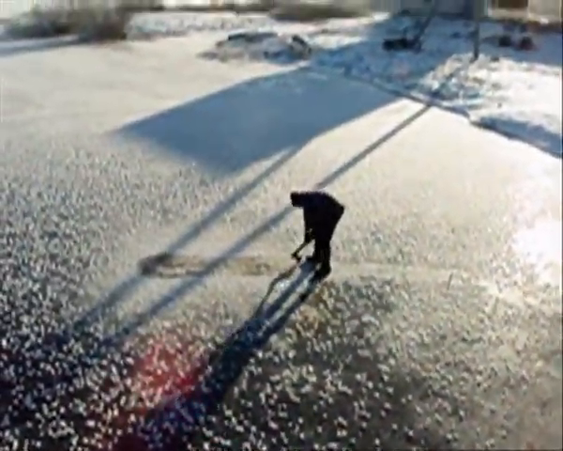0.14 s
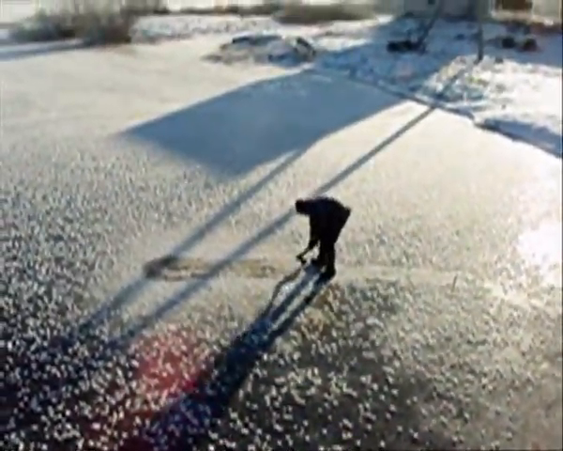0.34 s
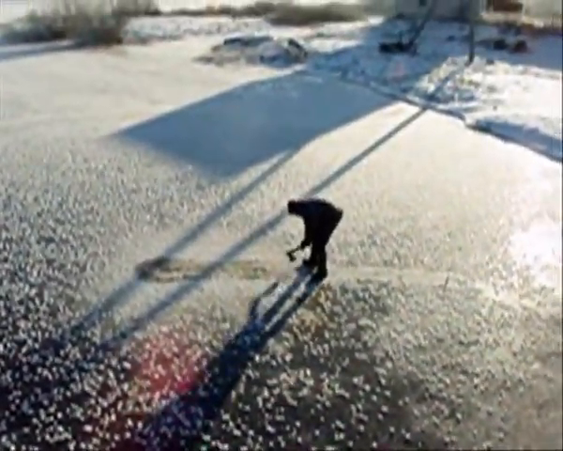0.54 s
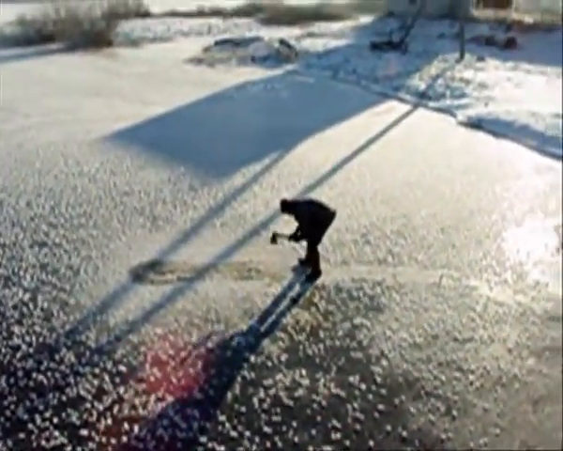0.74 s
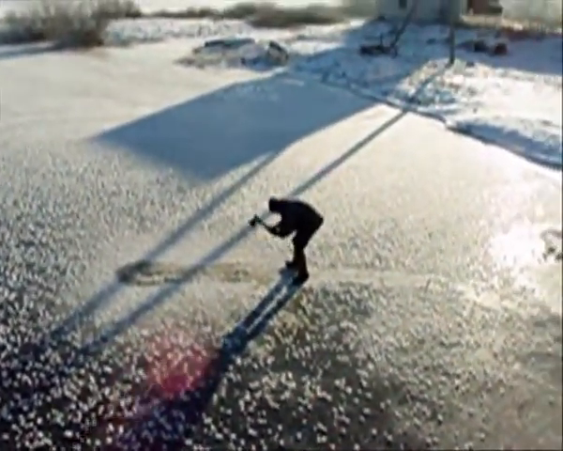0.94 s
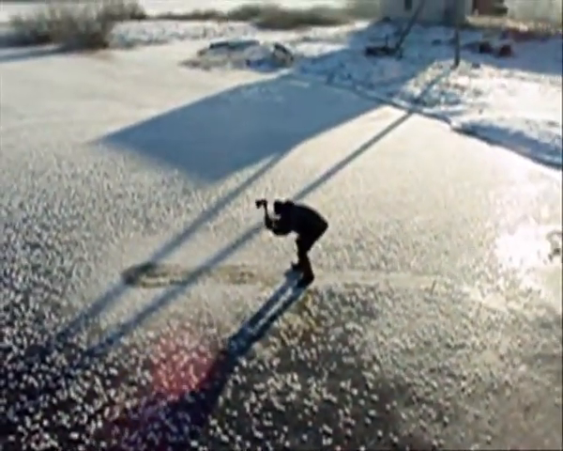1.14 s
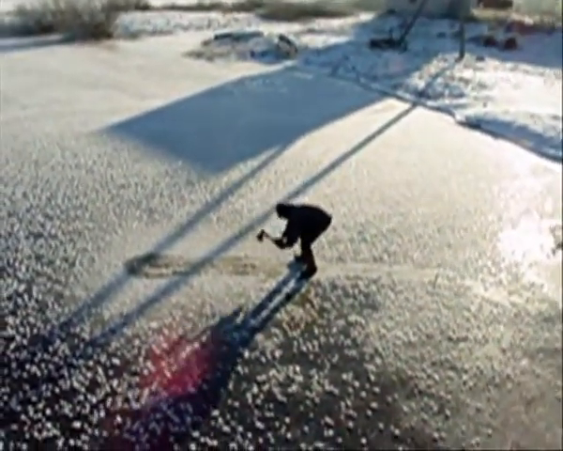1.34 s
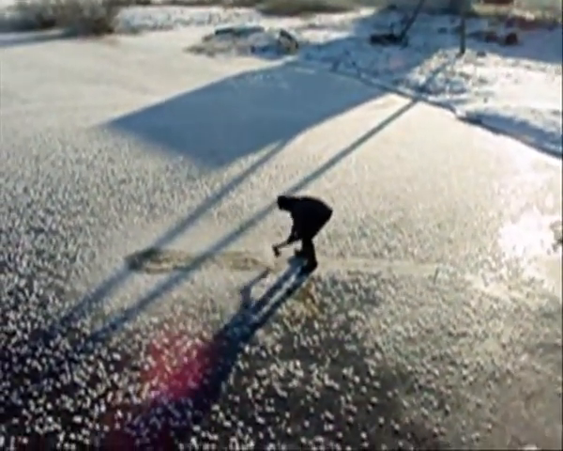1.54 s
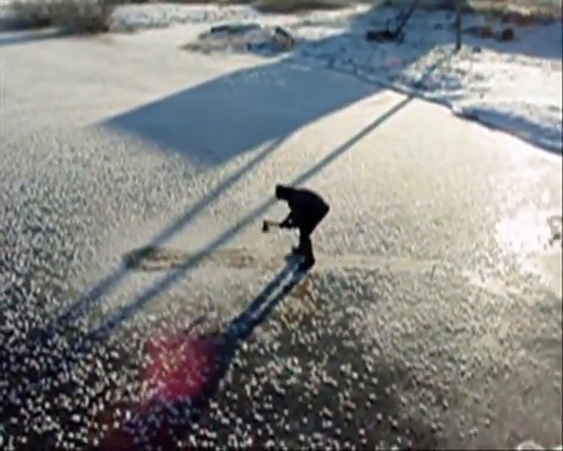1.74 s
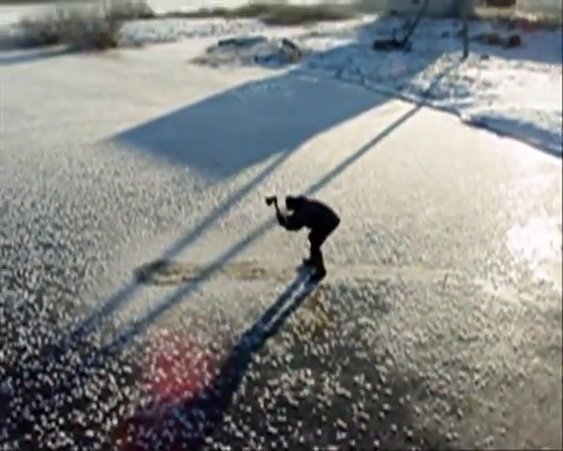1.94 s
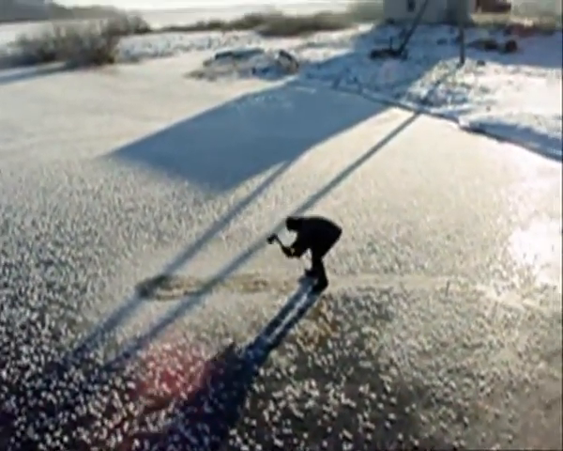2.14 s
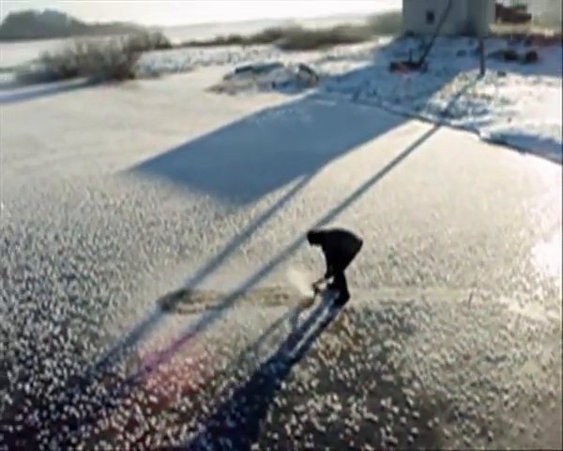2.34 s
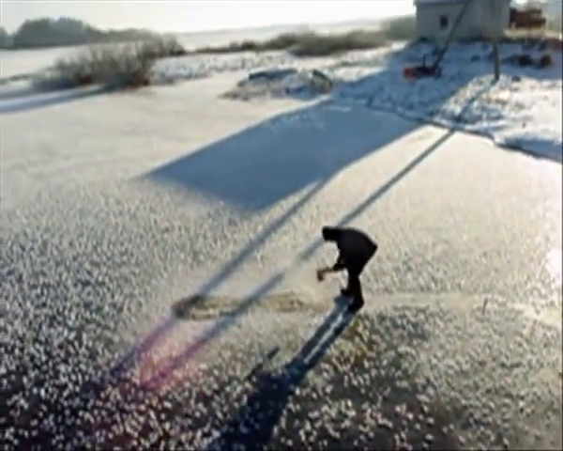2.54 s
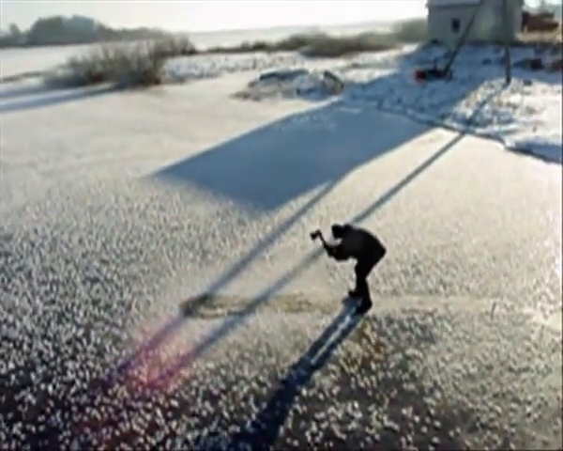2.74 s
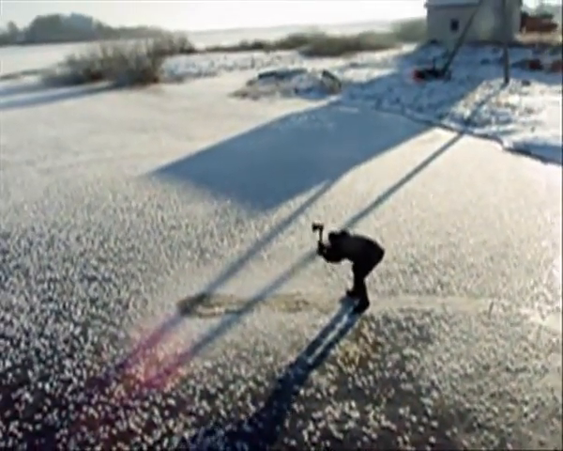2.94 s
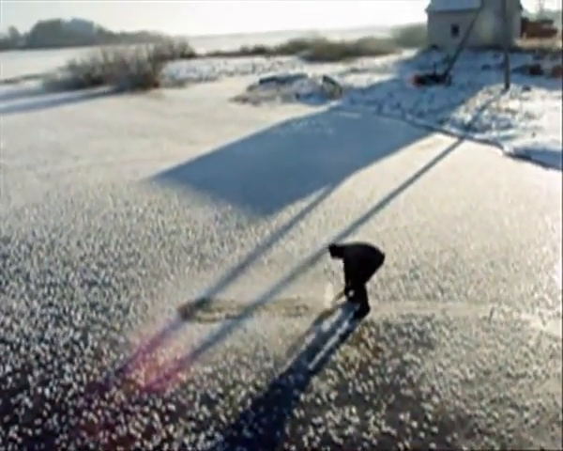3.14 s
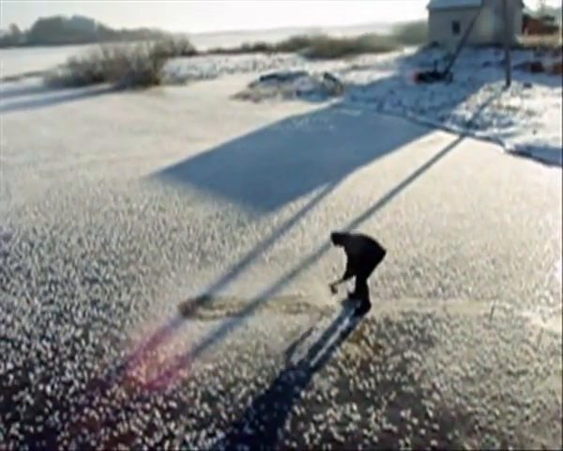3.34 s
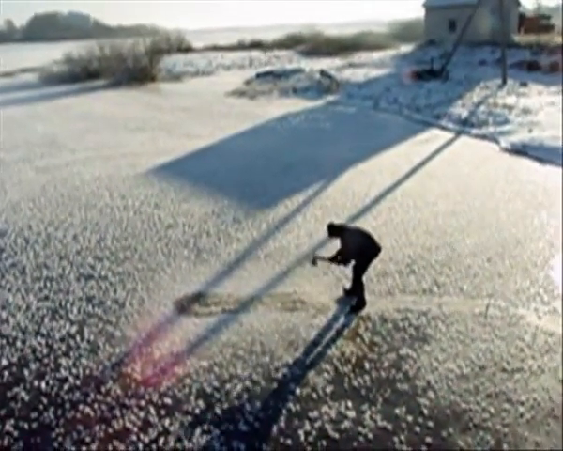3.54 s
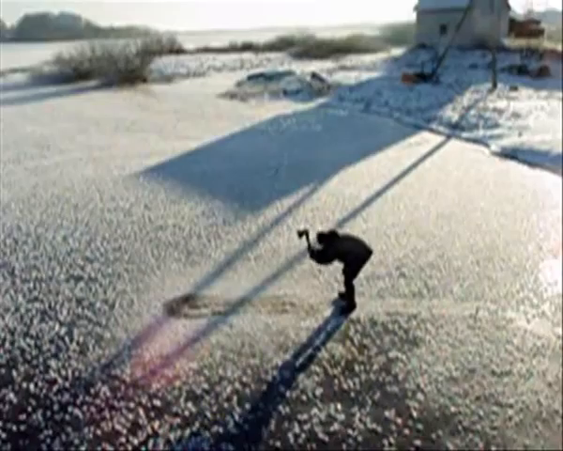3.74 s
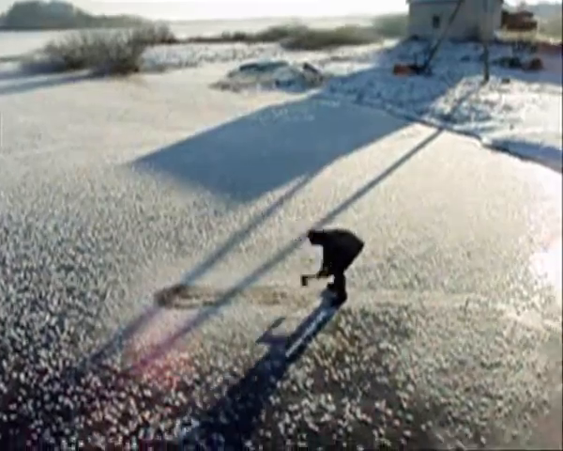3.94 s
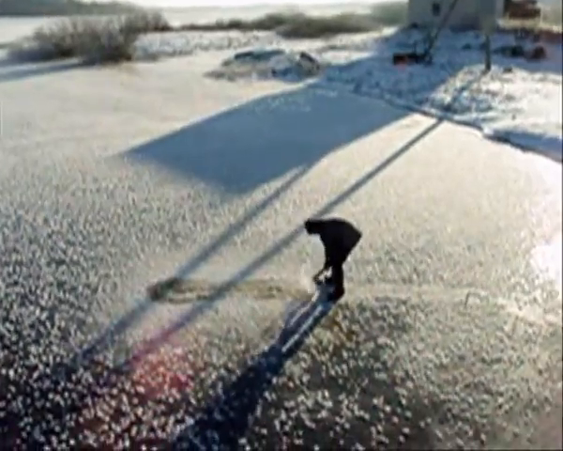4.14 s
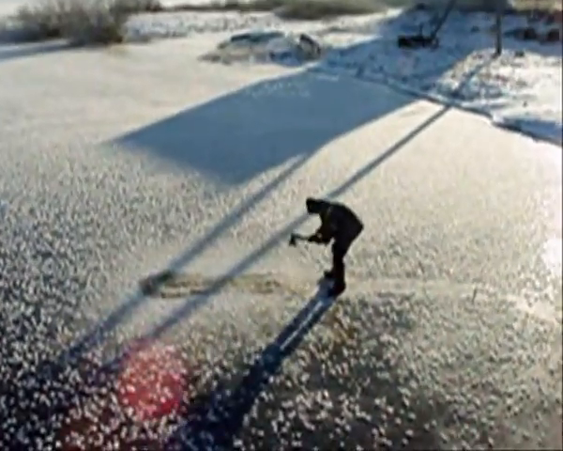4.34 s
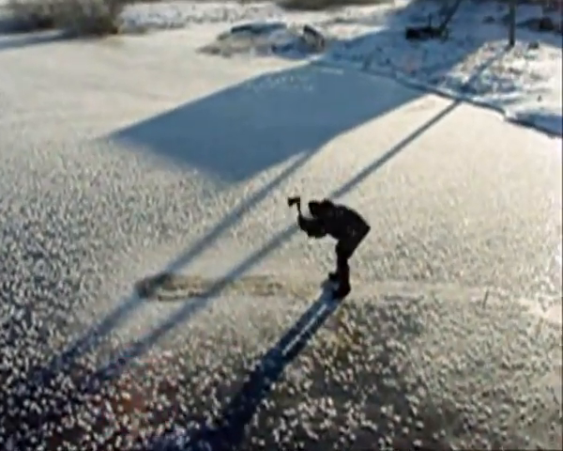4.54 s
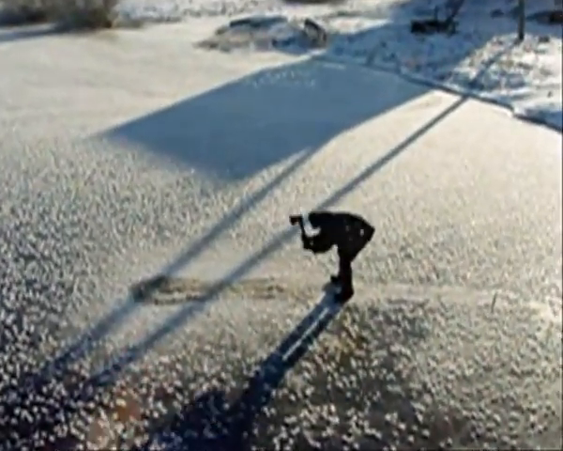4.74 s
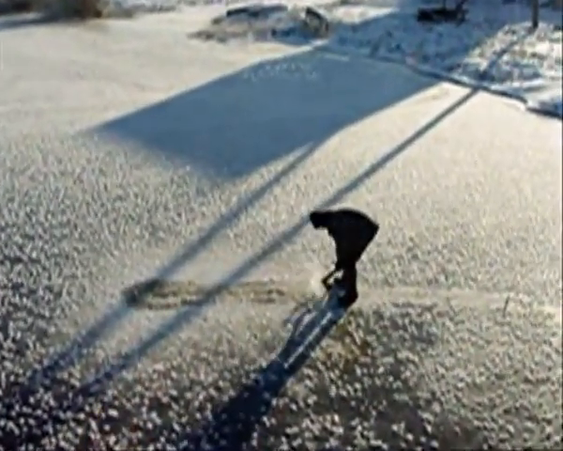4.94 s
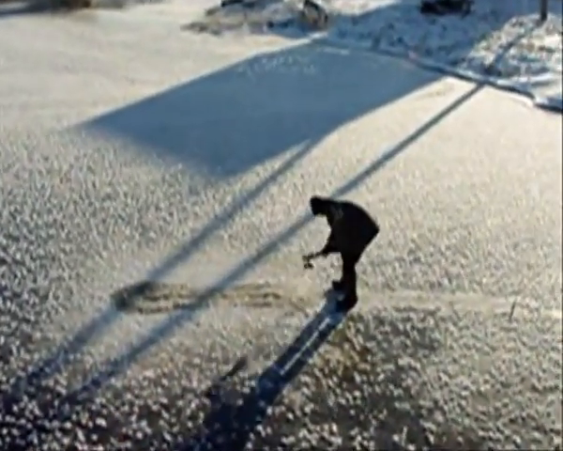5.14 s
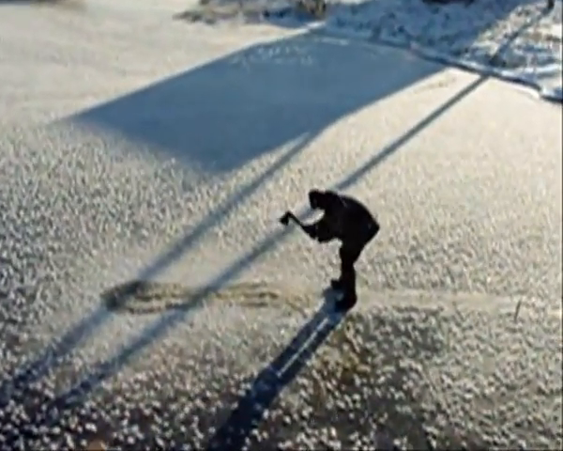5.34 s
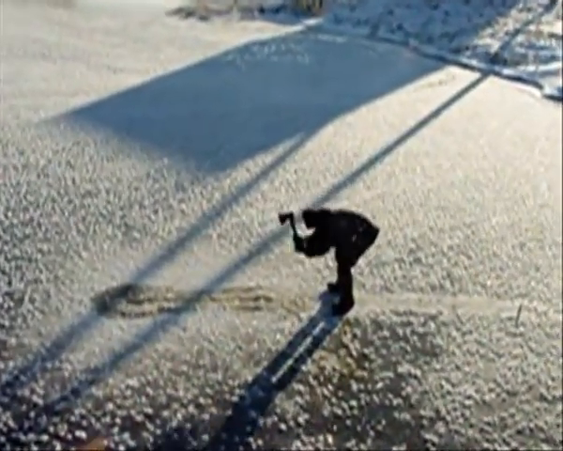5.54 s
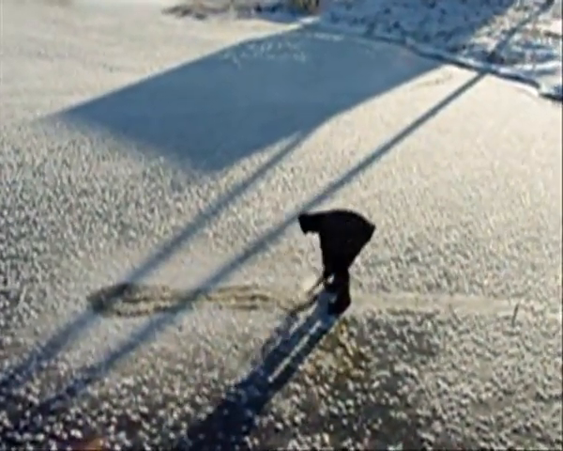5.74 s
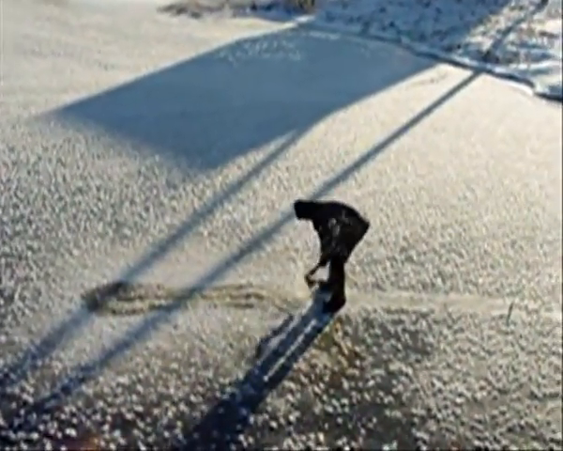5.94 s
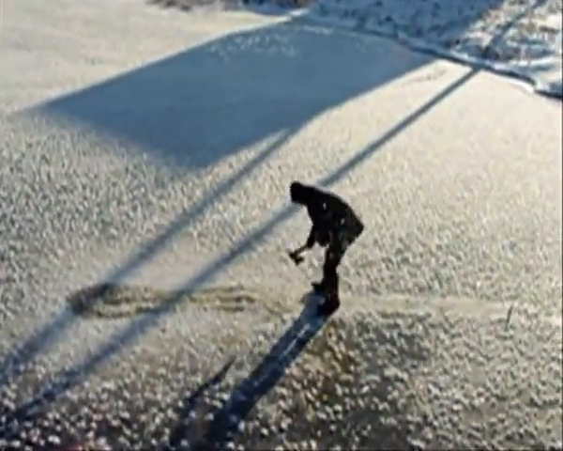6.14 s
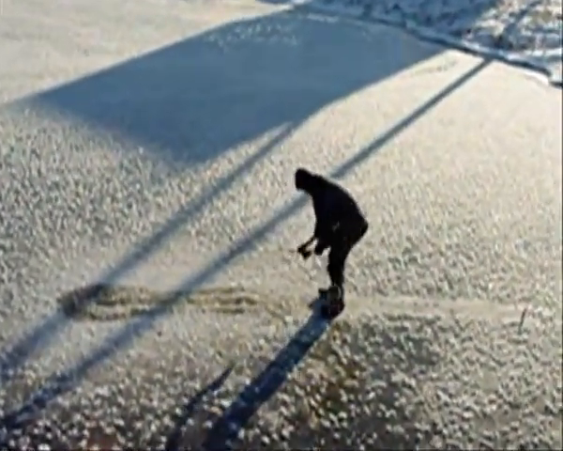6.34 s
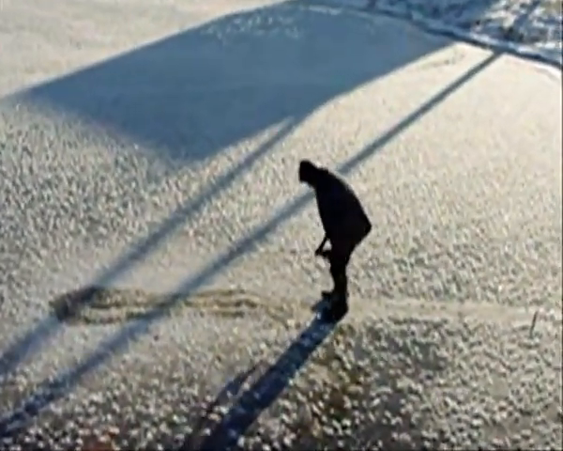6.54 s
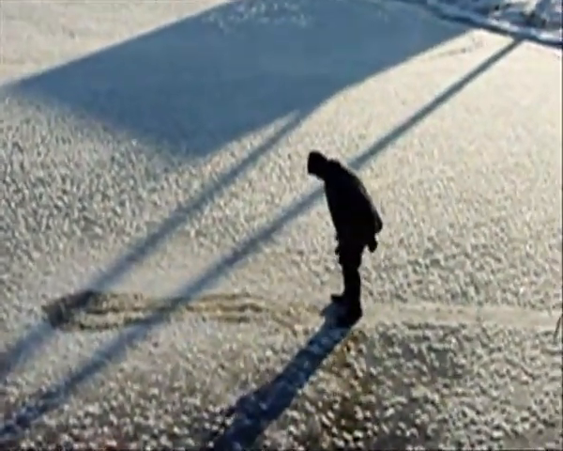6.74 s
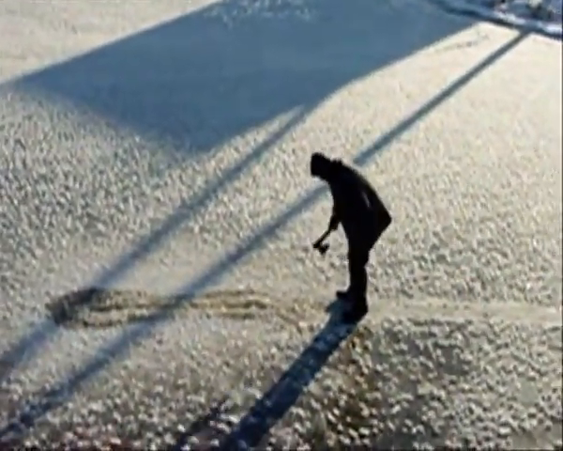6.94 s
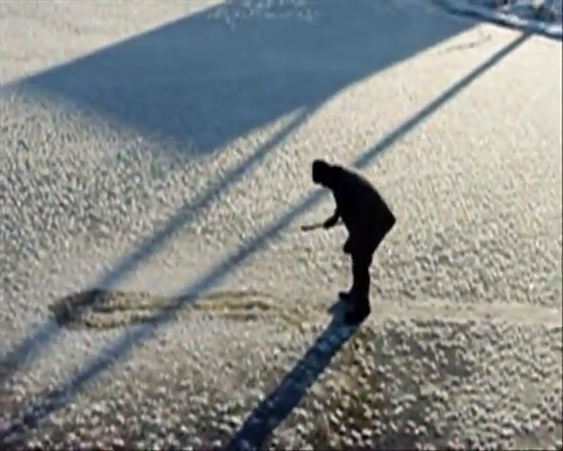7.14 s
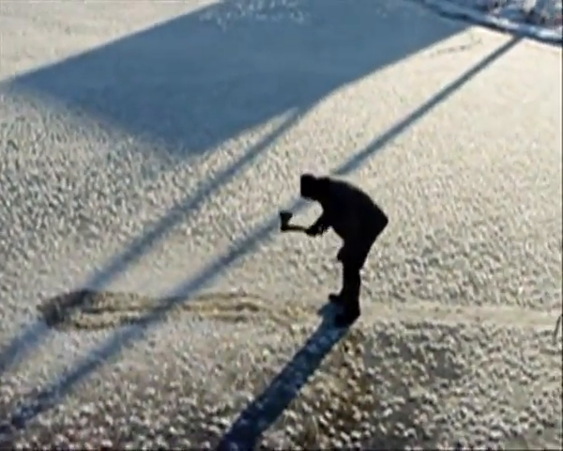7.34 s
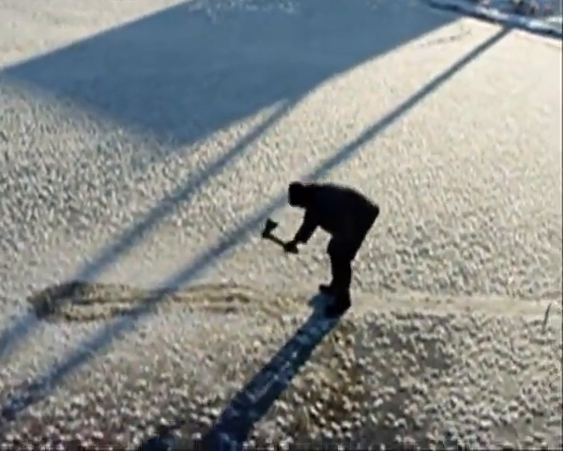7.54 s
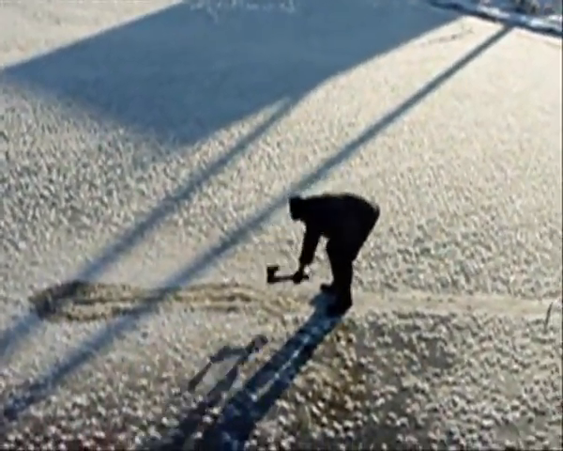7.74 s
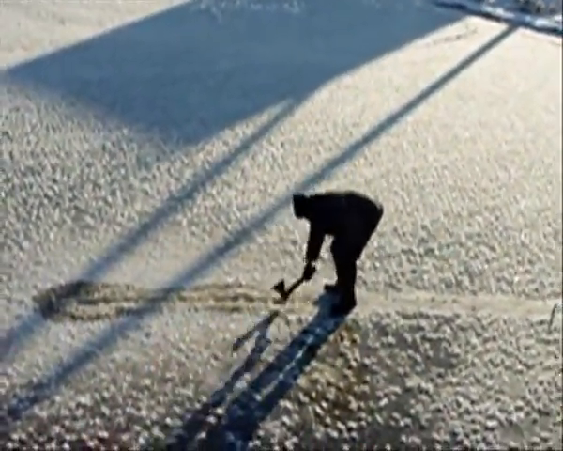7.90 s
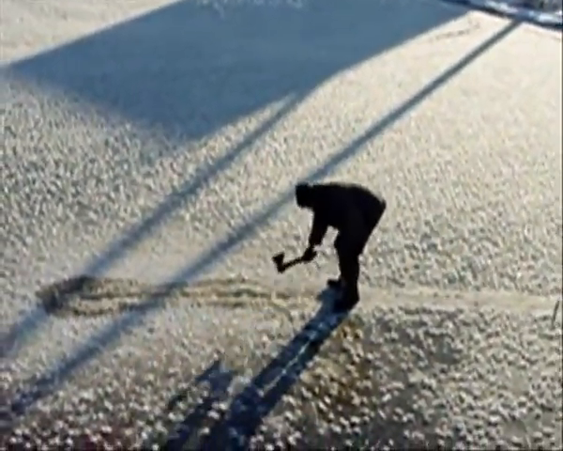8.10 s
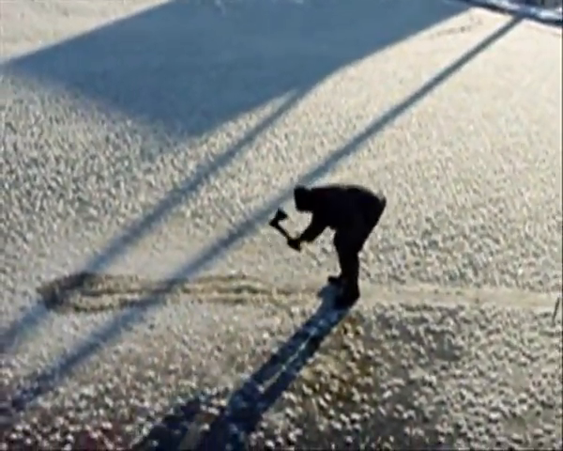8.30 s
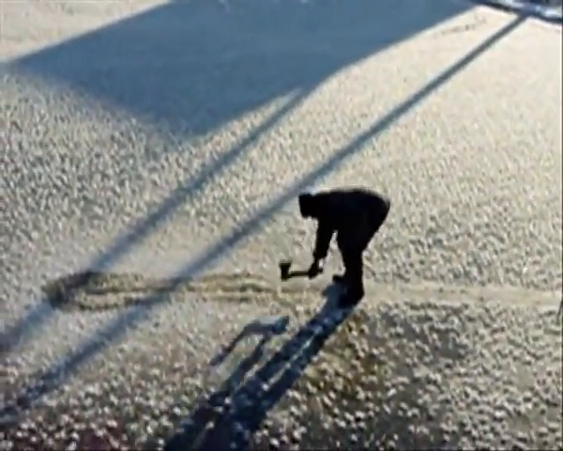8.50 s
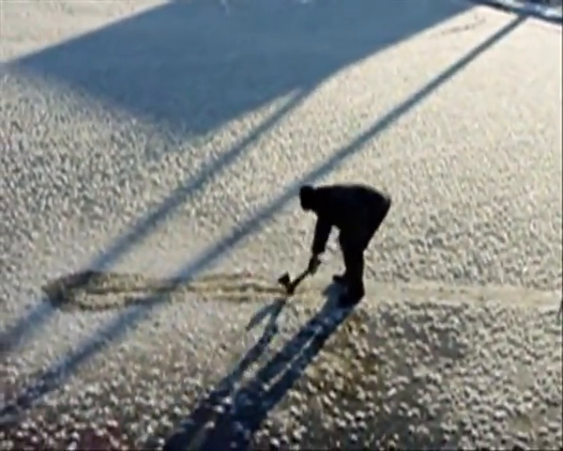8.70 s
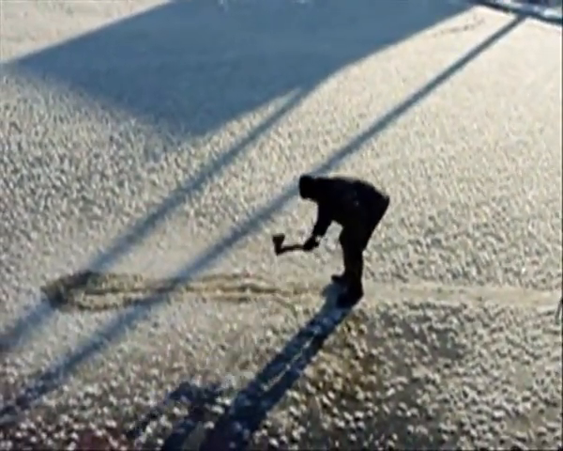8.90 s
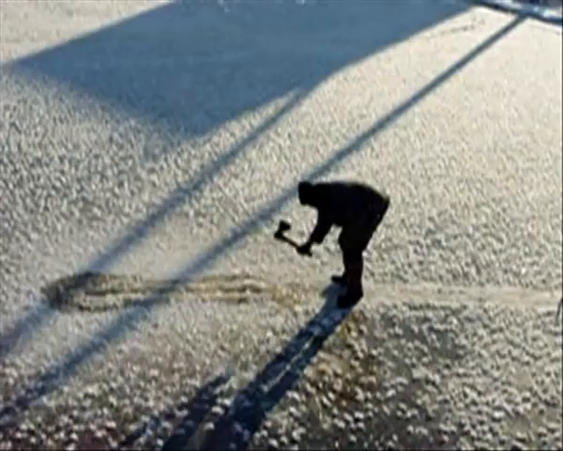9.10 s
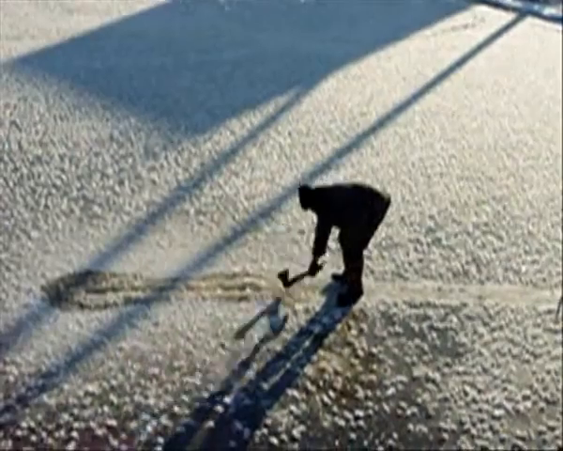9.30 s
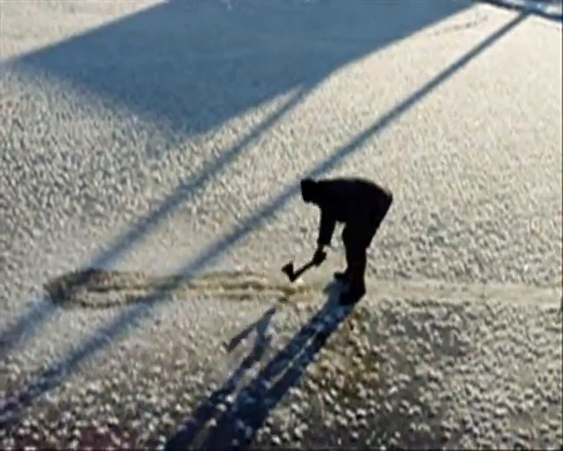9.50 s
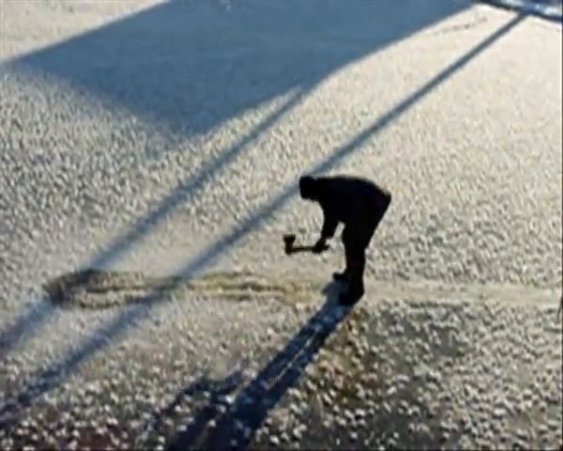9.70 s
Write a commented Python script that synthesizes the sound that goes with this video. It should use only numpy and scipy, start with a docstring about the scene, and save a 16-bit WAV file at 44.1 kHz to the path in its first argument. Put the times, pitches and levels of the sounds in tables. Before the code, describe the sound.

Out on a frozen lake, a hatchet strikes thin ice six times, slightly less than a second apart. Each blow is a sharp, bright crack with a quick falling chirp, low thud, skittering chips and a short hollow hum. The sheet pings as it cracks between blows. After a pause with boots crunching frost and clothes rustling, three duller, wet thunks follow. Light wind, faint shore echoes, close microphone overloading slightly on the hardest hits.

```python
"""On a frozen lake, a hatchet chops a slot in thin ice: six hard blows, then three dull, wet ones.
Bending waves outrun the sound in air, so a falling whistle comes before each blow and each crack of the sheet.
Bursts of tiny breaks, ringing in blade and slot, make the blows; clicks and ringing grains make the chips.
Shaped noise makes the humming sheet, and the shore echoes the blows.
Light wind, rustling clothes, boots on frost and one faint ring of metal lie behind."""
import sys
import numpy as np
from scipy import signal
from scipy.fft import rfft, irfft
from scipy.io import wavfile

SR = 44100
rng = np.random.default_rng(int(sys.argv[2]) if len(sys.argv) > 2 else 0)


def log_audio(samples):
    """Write samples as a 16-bit WAV file to the path given in sys.argv[1]."""
    # one column per channel
    frames = np.atleast_2d(samples).T
    # limit to full scale, then quantise
    limited = np.clip(frames, -1, 1)
    pcm = np.round(limited * 32767).astype(np.int16)
    wavfile.write(sys.argv[1], SR, pcm)


N = 434826
TIME = np.arange(N) / SR

# Blows of the hatchet. Each row: time in s, crack level in dB, rise in s, decay in s, tone as a factor
# on the bite, knock level in dB, thud level in dB, thud pitch in Hz, whistle level in dB, chips level in dB.
CHOPS = [(1.5919, -2, 0.0012, 0.0035, 1.17, -31, -14, 310, -15.5, -30.5),
         (2.42, -2, 0.00081, 0.0045, 1.02, -29, -13, 330, -27, -34),
         (3.2869, -4.5, 0.00076, 0.0045, 0.98, -12, -10.5, 296, -13, -29),
         (4.168, -4, 0.0017, 0.0039, 1.03, -13, -15, 275, -10.5, -31.5),
         (5.014, -4, 0.00096, 0.0043, 1.03, -9, -11.5, 340, -15, -32.5),
         (5.87, -6.5, 0.005, 0.0071, 0.96, -17, -9.5, 344, -14, -30),
         (7.9456, -16, 0.002, 0.0042, .88, -16, -9.5, 406, -8.5, -43),
         (8.7283, -15.5, .002, 0.0058, 0.87, -20, -3, 284, -9, -42.5),
         (9.4821, -20, 0.0043, 0.0059, 1.3, -22, -13.5, 300, -24, -36)]
# How much the body moves. Each row: time in s, then clothes and boots in dB, before trims and swings.
MOVES = [(0, -53, -39.5), (.3, -64, -45), (.45, -54, -50), (.9, -62, -47.5), (1.5, -60.5, -57),
         (2.3, -63, -43.5), (3.85, -53.5, -47), (4.7, -53.5, -54.5), (5.2, -55.5, -47.5), (5.6, -56, -58),
         (6.1, -54.5, -49), (7, -51, -47), (7.27, -65, -52), (7.57, -47.5, -55), (7.72, -68, -56),
         (8.05, -60.5, -51), (9.35, -56.5, -55.5), (9.86, -57.5, -55.5)]
# Spectrum of a short, bright click. Each row: frequency in Hz, relative level in dB per Hz.
CLICK = [(200, -13), (1200, -12), (2600, 1.5), (5000, 7), (9300, 4), (10500, -25), (16000, -22)]


def gain_of(db):
    """Amplitude factor for a level in dB."""
    return 10 ** (np.asarray(db) / 20)


def evened(x):
    """Brings x to rms 1."""
    return x / np.sqrt(np.mean(x ** 2) + 1e-20)


def add(mix, s, sound):
    """Lays a sound into the mix from s seconds on."""
    part = mix[max(round(s * SR), 0):][:len(sound)]
    part += sound[:len(part)]


def level(rows, axis=1):
    """Gain over time from one dB column of a curve."""
    rows = np.array(rows)
    return gain_of(np.interp(TIME, rows[:, 0], rows[:, axis]))


def colour(x, spectrum):
    """Filters x by a curve of (Hz, dB per Hz), at rms 1."""
    hz, db = np.transpose(spectrum)
    size = 2 * len(x)  # padded, so that the filter does not wrap round
    bins = np.fft.rfftfreq(size, 1 / SR)
    gains = gain_of(np.interp(np.log(bins + 1), np.log(hz), db))
    return evened(irfft(rfft(x, size) * gains)[:len(x)])


def resonate(x, hz, width):
    """A resonance of gain 1, with its width in Hz."""
    r = np.exp(-np.pi * width / SR)
    pole = r * np.exp(2j * np.pi * hz / SR)
    return 2 * signal.lfilter([1 - r], [1, -pole], x).real


def grains(size, per_s, spread_db):
    """Random clicks of either sign, a few of them large, at rms 1."""
    sizes = gain_of(spread_db * np.minimum(rng.exponential(1, size), 4))
    heights = sizes * rng.choice([-1, 1], size)
    return evened(heights * (rng.random(size) < per_s / SR))


def wander(size, rate):
    """Chance drift through a new random value rate times a second, at rms 1."""
    knots = rng.standard_normal(int(size / SR * rate) + 2)
    return evened(np.interp(np.arange(size) * rate / SR, np.arange(len(knots)), knots))


def clinks(size, per_s, spread_db=5, width=420, low_hz=1400, high_hz=8500, count=16):
    """Bits of ice of many sizes, each ringing briefly at its own pitch."""
    pitches = np.geomspace(low_hz, high_hz, count) * rng.uniform(.94, 1.06, count)
    hits = grains(size, per_s, spread_db)
    piece = rng.integers(0, count, size)
    total = np.zeros(size)
    for k, hz in enumerate(pitches):
        # higher pieces die out faster and are weaker
        total += resonate(hits * (piece == k), hz, width * np.sqrt(hz / 2500)) / hz ** .5
    return evened(total)


def outdoors(wind_db=1, lumps_db=4.5, air_db=-52, whine_hz=7450, whine_db=-68):
    """Lumpy wind, the sheet murmuring more as the boots load it, still air and a thin whine."""
    # Spectra of the wind and the still air. Each row: frequency in Hz, relative level in dB per Hz.
    wind_spectrum = [(20, -12), (50, 0), (90, 0.5), (150, -3), (260, -10.5), (500, -46), (1500, -57)]
    air_spectrum = [(30, -3.5), (120, -4.5), (420, 2), (800, -4), (1500, -8.5), (3200, -13), (5000, -18.5),
                    (9600, -18.5), (10400, -34), (15500, -27)]
    # Wind on the microphone, one long gust and one short. Each row: time in s, level in dB before trim and lumps.
    gusts = [(0, -55), (.6, -65), (1.55, -45), (2.95, -42), (3.7, -42), (4.2, -55), (5, -60.5),
             (5.5, -64.5), (6.65, -63.5), (6.88, -41), (7.3, -47.5), (7.7, -66), (8.05, -54.5), (9.4, -64),
             (9.86, -62)]
    murmur_spectrum = [(100, -14.5), (300, 1.0), (450, -1.0), (600, -8), (1000, -15), (3000, -38)]
    murmur_db, murmur_per_db = -52.5, 0.3  # level, and its rise in dB per dB of the boots

    lumps = gain_of(wind_db + lumps_db * wander(N, 25))
    wind = colour(rng.standard_normal(N), wind_spectrum) * level(gusts) * lumps
    load = evened(level(MOVES, axis=2) ** murmur_per_db)
    murmur = colour(rng.standard_normal(N), murmur_spectrum) * load * gain_of(murmur_db)
    air = gain_of(air_db) * colour(rng.standard_normal(N), air_spectrum)
    whine = gain_of(whine_db) * evened(resonate(rng.standard_normal(N), whine_hz, 9.1))
    return wind + murmur + air + whine


def swinging():
    """Gain over time: the body's noise stills as the blade falls and swells as it is pulled free."""
    # Wind-up left level, stillness as the blade falls, a swell as it is pulled free.
    # Each row: time from the blow in s, width in s, change in dB.
    swing = [(-.2, 0.24, 0), (-.05, 0.042, -7), (.2, .08, 2)]
    change_db = np.zeros(N)
    for blow_s, *_ in CHOPS:
        for delay, width, db in swing:
            change_db += db * np.exp(-((TIME - blow_s - delay) / width) ** 2)
    return gain_of(change_db)


def movement(swish_db=-0.5, crunch_db=-4, grit_db=-8, uneven_db=1.5):
    """Cloth swishes with the arm; frost crunches and loose grit clicks under the boots."""
    swish_spectrum = [(1500, -11.0), (4000, -7.0), (6000, -1.5), (9300, -3.5), (10300, -16.5), (16000, -19.0)]
    crunch_spectrum = [(200, -6), (800, 8.5), (1500, 0.0), (3200, -3), (5500, -15), (12000, -46)]
    swish = gain_of(swish_db) * colour(grains(N, 9000, 8.4), swish_spectrum)
    crunch = gain_of(crunch_db) * colour(grains(N, 2500, 3.5), crunch_spectrum)
    grit = gain_of(grit_db) * clinks(N, 170, spread_db=3.5, width=270)
    body = swish * level(MOVES) + (crunch + grit) * level(MOVES, axis=2)
    return body * swinging() * gain_of(uneven_db * wander(N, 18))


def scuffs(build_db=7, clump_db=3):
    """Clumps of frost crystals break under a sliding sole."""
    # Boots over frost, each scuff building up and stopping short. Each row: start in s, end in s, level in dB.
    slides = [(.07, 0.103, -53), (0.169, 0.379, -46), (5.959, 6, -41), (6.407, 6.48, -44.5),
              (6.98, 7.066, -44.5), (7.584, 7.625, -43.5), (8.013, 8.09, -49.5), (8.6, 8.693, -45.5),
              (9.032, 9.146, -51.5), (9.627, 9.7, -48)]
    # Spectrum of the breaking frost. Each row: frequency in Hz, relative level in dB per Hz.
    frost_spectrum = [(200, -12), (800, 3), (3000, -1), (5000, 0), (9300, -3.5), (10500, -15), (16000, -16)]
    out = np.zeros(N)
    for start, end, db in slides:
        size = max(int((end - start) * SR), SR // 100)
        push_db = build_db * np.linspace(-.5, .5, size) + clump_db * wander(size, 111)
        push = gain_of(push_db) * signal.windows.tukey(size, .1)
        frost = colour(grains(size, 4000, 3.5), frost_spectrum)
        add(out, start, gain_of(db) * evened(frost * push))
    return out


def whistle(lead, top_hz=2400, end_hz=425, fall=5.3, swell=0.7, ring=0.0072):
    """High bending waves come first; the pitch sinks to where they travel as fast as sound in air."""
    t = np.arange(int((lead + 0.0402) * SR)) / SR
    # uneven ice bends the quick, short waves most, so the start is ragged
    ragged = 1 + .2 * wander(len(t), 700)
    flutter_db = 2.6 * wander(len(t), 260)
    hz = end_hz + (top_hz - end_hz) * np.exp(-fall * t / lead) * ragged
    shape = np.minimum(t / lead / 0.78, 1) ** swell * np.exp(-np.maximum(t - lead, 0) / ring)
    wave = gain_of(flutter_db) * shape * np.sin(2 * np.pi * np.cumsum(hz) / SR)
    return evened(wave) * np.sqrt(np.mean(shape ** 2))


def slips(lead, length, dulling=22, count=22):
    """A crack advances in jerks whose whistles overlap and beat; slow cracks have less treble."""
    out = np.zeros(SR // 4)
    for when, size in rng.random((count, 2)):
        one = whistle(lead, top_hz=2646, swell=0.4 + dulling * length)
        add(out, when * length, (2 * size - 1) * one)
    return out * np.linalg.norm(one) / np.linalg.norm(out)  # together as strong as one whistle


def hum(t60=0.66, rise=0.0036):
    """Bending waves scatter back from all over the sheet; t60 is the time to fall by 60 dB, in s."""
    # Spectrum of the humming sheet. Each row: frequency in Hz, relative level in dB per Hz.
    sheet_spectrum = [(60, -24), (180, -15), (290, -4), (360, -4), (415, 1), (480, -11), (580, -11),
                      (800, -21.5), (1400, -31), (4000, -47)]
    t = np.arange(SR * 3 // 4) / SR
    waves = colour(rng.standard_normal(len(t)), sheet_spectrum)
    return waves * (1 - np.exp(-t / rise)) * gain_of(-60 * t / t60)


def cracks(snap_decay=0.0082, splinter_db=-12, splinter_share=0.43):
    """The loaded sheet cracks farther away: long falling whistles amid splintering, a faint snap, then the hum."""
    # Cracks running through the sheet. Each row: start in s, strength in dB,
    # length of the slipping in s, snap level in dB.
    runs = [(.084, -44.5, .043, -38.5), (.18, -36, 0.05, -56), (.255, -36.5, 0.053, -55),
            (2.861, -26.5, 0.018, -26), (4.111, -24, 0.021, -25.5), (4.893, -20, .013, -24),
            (5.463, -24, 0.017, -28.5), (5.99, -25.5, 0.017, -35.5), (6.975, -33.5, 0.038, -35),
            (7.075, -32.5, 0.063, -41), (7.426, -35.5, 0.048, -62), (7.508, -39.5, 0.064, -42),
            (7.78, -37.5, 0.049, -50), (7.975, -33.5, .04, -41), (8.43, -41.5, 0.087, -60),
            (9.029, -44, 0.048, -52)]
    # Spectrum of the snap. Each row: frequency in Hz, relative level in dB per Hz.
    snap_spectrum = [(100, -28), (600, 2), (1500, 8.5), (3000, -1), (5000, 5.5), (9300, -1), (10300, -15),
                     (16000, -11)]
    splinter_spectrum = [(150, -17), (500, 2.5), (1000, 1), (2000, -10), (3500, -24), (10000, -27)]
    lead = .041  # s from the start of the whistle to the snap in air
    first_jerk_db, hum_db = 4.5, -4.5  # against the strength, before the slope with length
    jerk_db_per_s, hum_db_per_s = -180, -110  # a slow crack starts more softly and stirs the sheet less

    out, t = np.zeros(N), np.arange(SR // 6) / SR
    for s, db, length, snap_db in runs:
        u = t / (splinter_share * length)
        splinters = colour(grains(len(t), 2500, 3.2), splinter_spectrum) * u * np.exp(1 - u)
        snap = colour(grains(len(t), 7100, 0.63), snap_spectrum) * np.exp(-t / snap_decay)
        add(out, s, gain_of(db + first_jerk_db + jerk_db_per_s * length) * whistle(lead))
        add(out, s, gain_of(db + splinter_db) * splinters)
        add(out, s, gain_of(db) * slips(lead, length))
        add(out, s + lead, gain_of(snap_db) * snap)
        add(out, s + lead, gain_of(db + hum_db + hum_db_per_s * length) * hum(t60=0.48))
    return out


def landings(count=4, low_hz=1500, high_hz=8000):
    """Each blow throws up a few chips that land at random, as rows of (s, dB before trim, centre Hz)."""
    from_s, to_s = .16, 0.61  # flight time
    land_db, spread_db = -24.5, 1  # against the crack of the blow
    rows = []
    for s, crack_db, *_ in CHOPS:
        for flight, weight, pitch in rng.random((count, 3)):
            when = s + from_s + flight * (to_s - from_s)
            db = crack_db + land_db + spread_db * (2 * weight - 1)
            rows.append((when, db, low_hz * (high_hz / low_hz) ** pitch))
    return rows


def ticks(rise=0.00023, decay=0.0029, tail_db=-20, tail=0.003, ring_db=3, width=650, trim_db=-7.5):
    """Short clicks, mostly of small ice: noise bursts, each with a resonance of its own pitch."""
    # Small pieces of ice landing or snapping; those at 1.83 and 2.66 s are late echoes of blows,
    # and the last row is the blade's first touch before the final blow.
    # Each row: time in s, level in dB before the trim, centre in Hz.
    single_clicks = [(0.6624, -28, 6200), (0.842, -28, 1920), (0.8942, -28, 1350), (0.9645, -27.5, 1570),
                     (1.8276, -31, 1490), (2.13, -23.5, 5430), (2.1742, -24, 1230), (2.575, -25, 4230),
                     (2.6554, -31, 2340), (3.2337, -26, 7260), (4.307, -21, 1430), (4.446, -19.5, 7100),
                     (5.3527, -16.5, 6750), (6.317, -27, 4590), (6.3957, -20, 2950), (6.5583, -17, 7800),
                     (6.6053, -21.5, 5400), (6.6273, -29, 7800), (6.64, -23, 5750), (6.6805, -22.5, 2410),
                     (6.696, -22, 7400), (6.7984, -21, 7350), (6.8508, -28.5, 1700), (6.8612, -22.5, 2310),
                     (9.4688, -11, 2320)]
    out, t = np.zeros(N), np.arange(SR // 25) / SR
    shape = (1 - np.exp(-t / rise)) * (np.exp(-t / decay) + gain_of(tail_db) * np.exp(-t / tail))
    loudness = np.sqrt(np.mean(shape ** 2)) / shape.max()
    for s, db, hz in list(single_clicks) + landings():
        burst = rng.standard_normal(len(t)) * shape
        click = colour(burst, CLICK) + gain_of(ring_db) * evened(resonate(burst, hz, width))
        add(out, s, gain_of(db + trim_db) * evened(click) * loudness)
    return out


def ringing(breaks, modes, tone=1):
    """The breaks excite a set of resonances, mixed by level, at rms 1."""
    return evened(sum(gain_of(db) * evened(resonate(breaks, hz * tone, width)) for hz, width, db in modes))


def fracture(rise, decay, tone, before, bite_db, knock_db, hold=0.00055):
    """A burst of tiny breaks that swells as the blade enters, part of it ringing in blade and slot."""
    # Steel biting into ice. Each row: frequency in Hz before the tone factor, width in Hz, relative level in dB.
    bite_modes = [(1640, 240, -1.5), (2340, 160, 13), (2520, 220, -3.5), (3400, 1600, -7)]
    # Hollow knock of the slot. Each row: frequency in Hz, width in Hz, relative level in dB.
    knock_modes = [(446, 110, -13), (720, 65, -2), (890, 140, 11)]
    # Spectrum of the shattering. Each row: frequency in Hz, relative level in dB per Hz.
    shatter_spectrum = [(40, -15), (150, -4.5), (300, 5.5), (1000, -1), (3000, -7.5), (4600, -8.5),
                        (9300, -13), (10500, -36), (15500, -29)]
    t = np.arange(-before, .08, 1 / SR)
    shape = np.exp(np.minimum(t, 0) / rise - np.maximum(t - hold, 0) / decay)
    breaks = grains(len(t), 16000, 1.17) * shape
    bite = ringing(breaks, bite_modes, tone)
    knock = ringing(breaks, knock_modes)
    crack = evened(colour(breaks, shatter_spectrum) + gain_of(bite_db) * bite)
    return (crack + gain_of(knock_db) * knock) * np.sqrt(np.mean(shape ** 2))


def thud(hz, swell=0.0025):
    """The sheet is pushed down and swings a few times, damped by the water."""
    t = np.arange(SR // 15) / SR
    return t / swell * np.exp(1 - t / swell) * np.sin(2 * np.pi * hz * t)


def spray(t60=0.57, rise=0.0028, clump_db=3):
    """Chips fly off and skitter over the ice; the larger ones ring."""
    # Spectrum of the chips. Each row: frequency in Hz, relative level in dB per Hz.
    chip_spectrum = [(60, -3), (300, 4.5), (800, -1), (1300, -2.5), (3000, -3), (5000, -15), (9500, -14.5),
                     (10500, -23.5), (16000, -20)]
    t = np.arange(SR * 3 // 4) / SR
    fading = gain_of(-60 * t / t60 + clump_db * wander(len(t), 109.0))
    chips = colour(grains(len(t), 3000, 3.4), chip_spectrum)
    chunks = clinks(len(t), 320, spread_db=3, width=200, low_hz=700, high_hz=4200)
    return evened(chips + gain_of(-5) * chunks) * (1 - np.exp(-t / rise)) * fading


def heave(db=-21.5, length=0.0032):
    """One blow heaves the whole sheet: a low push without a ring."""
    u = np.arange(SR // 15) / SR / length
    return gain_of(db) * u * (2 - u) * np.exp(1 - u)


def shore(x):
    """Echoes, thinned in the bass and dulled by distance."""
    # Reflections from the shore. Each row: delay in s, level in dB.
    reflections = [(0.088, -19.5), (.236, -33)]
    out = np.zeros(N)
    far = signal.sosfilt(signal.butter(1, [900, 4500], "band", fs=SR, output="sos"), x)
    for delay, db in reflections:
        add(out, delay, gain_of(db) * far)
    return out


def hatchet(sweep=0.00802, bite_db=1, bite_per_db=0.7):
    """Each blow: whistle through the ice, crack and thud through the air, then chips and hum."""
    whistle_lead, before = .0125, .03  # s by which the whistle and the swelling breaks start ahead of the blow
    hum_db, hum_thud_db = -18, -8  # the sheet hums with a share of the blow; the thud counts less
    blows, tails = np.zeros(N), np.zeros(N)
    hardest = max(row[1] for row in CHOPS)
    for s, crack_db, rise, decay, tone, knock_db, thud_db, thud_hz, whistle_db, chips_db in CHOPS:
        ringing_db = bite_db + bite_per_db * (crack_db - hardest)  # dull blows ring less
        falling = whistle(sweep, top_hz=1913, end_hz=376, fall=3.216, swell=1.25, ring=0.0033)
        crack = fracture(rise, decay, tone, before, ringing_db, knock_db - crack_db)
        push = np.linalg.norm(gain_of([knock_db, whistle_db, thud_db + hum_thud_db]))
        add(blows, s - whistle_lead, gain_of(whistle_db) * falling)
        add(blows, s - before, gain_of(crack_db) * crack)
        add(blows, s, gain_of(thud_db) * thud(thud_hz))
        add(tails, s, gain_of(chips_db) * spray())
        add(tails, s, gain_of(hum_db) * push * hum(t60=0.6, rise=0.017))
    add(blows, 5.013, heave())
    return blows + shore(blows) + tails


def ping(start=8.5306, ping_db=-40, rattle_db=3, touch_db=-3, touch_decay=0.013):
    """Something metal is touched, and rings faintly with a slight rattle."""
    # Light ring of metal. Each row: frequency in Hz, relative level in dB, time to fall by 60 dB in s.
    metal_modes = [(825, -9, 0.5), (1290, -10, 0.44), (1720, -3.5, 0.39), (2250, -8, .45),
                   (2610, -10, 0.32), (3450, -1, 0.3), (4000, -5, 0.22), (4130, 4, 0.058),
                   (4770, -11, 0.44), (4950, -13, .3), (5626, -9, 0.11), (6840, -10, .2)]
    out, t = np.zeros(N), np.arange(SR // 3) / SR
    ring = np.zeros(len(t))
    for hz, db, t60 in metal_modes:
        rattle = rattle_db * wander(len(t), 120)
        ring += gain_of(db - 60 * t / t60 + rattle) * np.sin(2 * np.pi * hz * t)
    touch = gain_of(touch_db) * colour(rng.standard_normal(len(t)), CLICK) * np.exp(-t / touch_decay)
    add(out, start, gain_of(ping_db) * (ring + touch))
    return out


def scene():
    """All layers summed into one channel."""
    background = outdoors() + movement() + scuffs()
    return (background + cracks() + ticks() + hatchet() + ping())[None]


def record(dry):
    """Loud peaks are rounded off as they overload the microphone; then the treble ends at 16 kHz."""
    clipped = dry / (1 + dry ** 8) ** (1 / 8)
    lowpass = signal.firwin(401, 16000, window=("kaiser", 8), fs=SR)
    return signal.oaconvolve(clipped, lowpass[None], "same")


dry = scene()
out = record(dry)
log_audio(out)
```